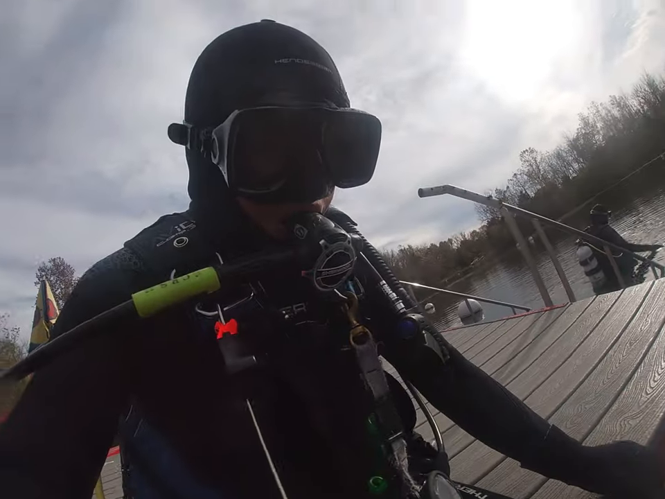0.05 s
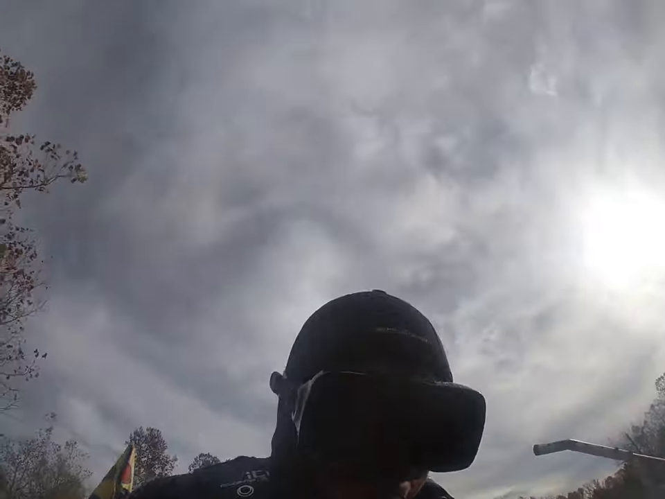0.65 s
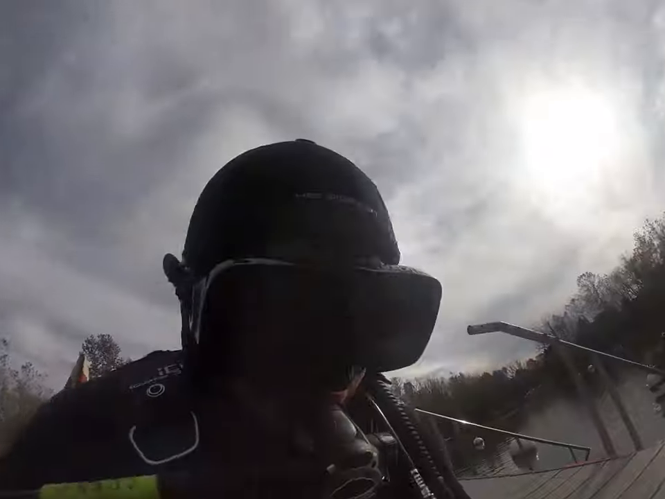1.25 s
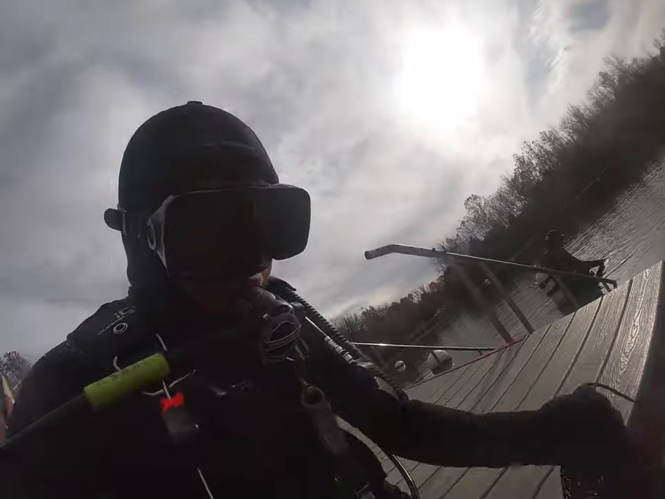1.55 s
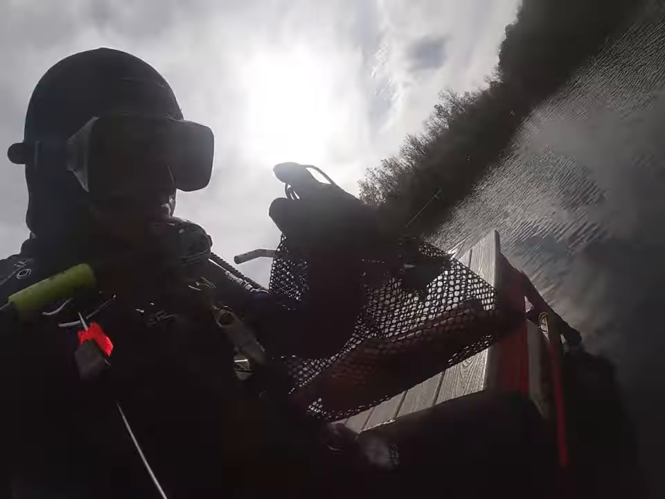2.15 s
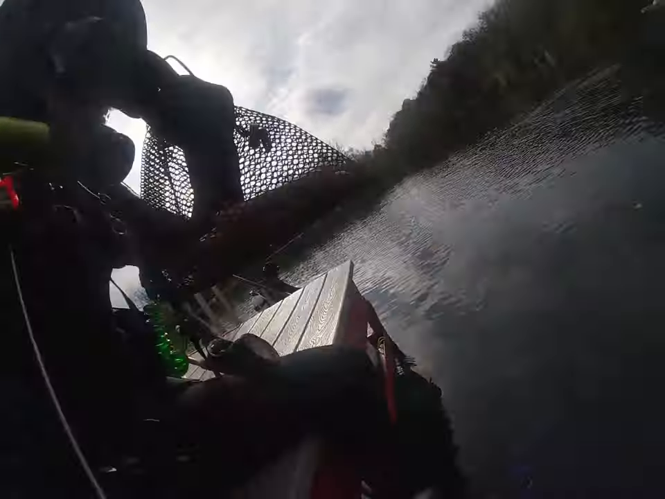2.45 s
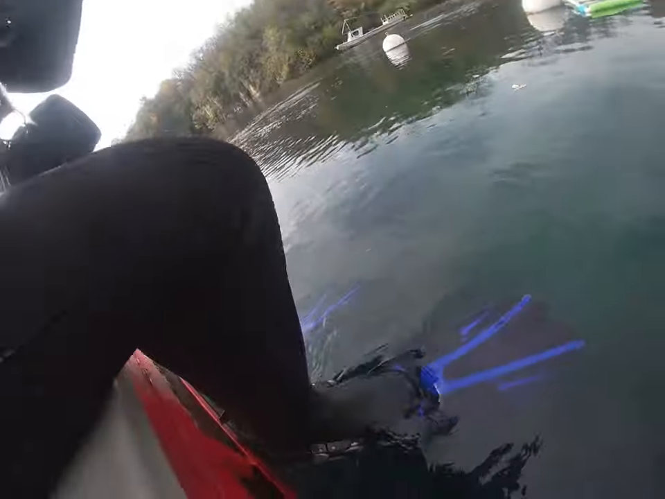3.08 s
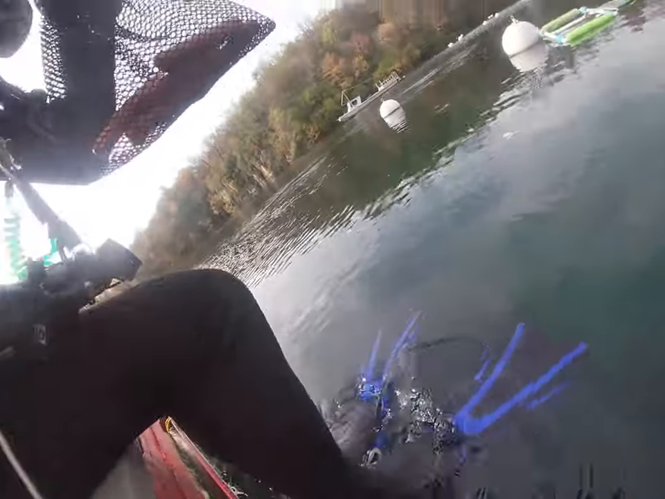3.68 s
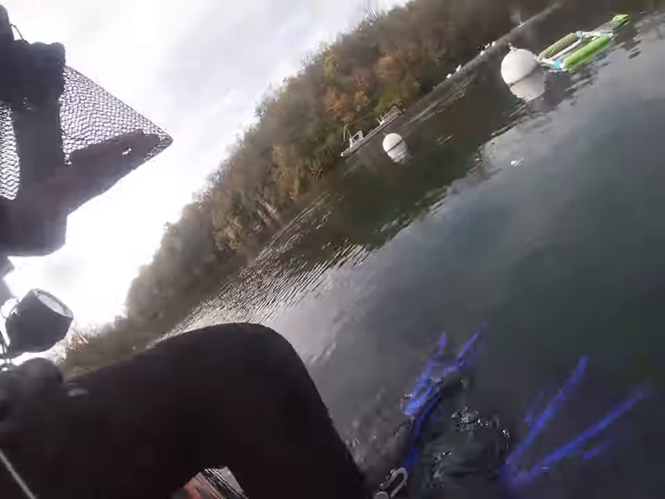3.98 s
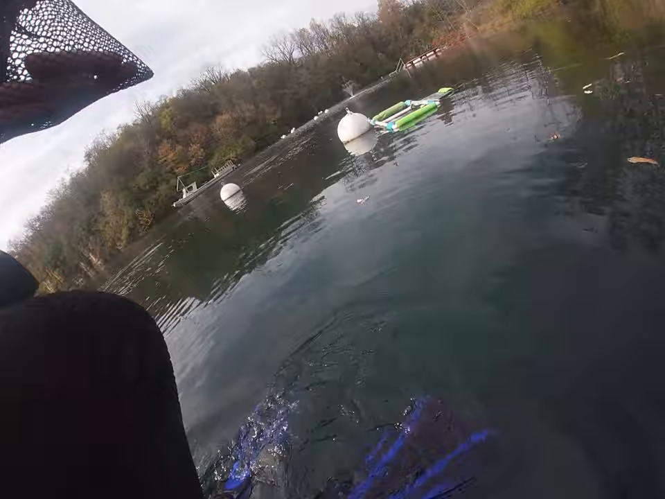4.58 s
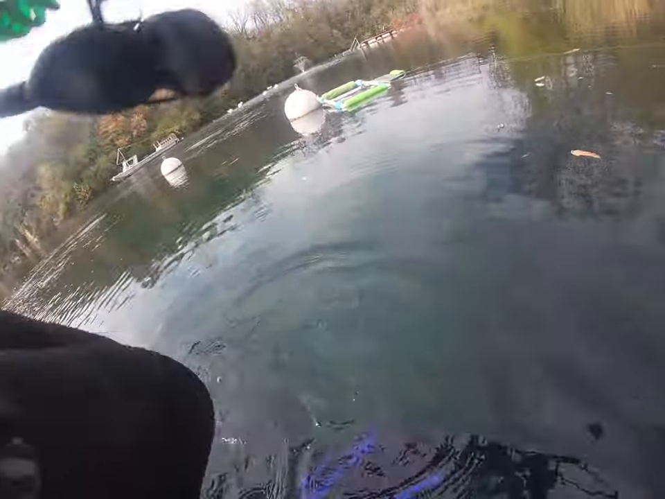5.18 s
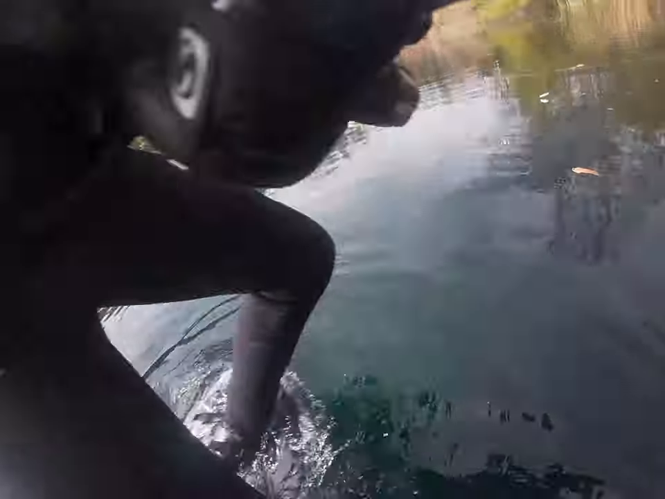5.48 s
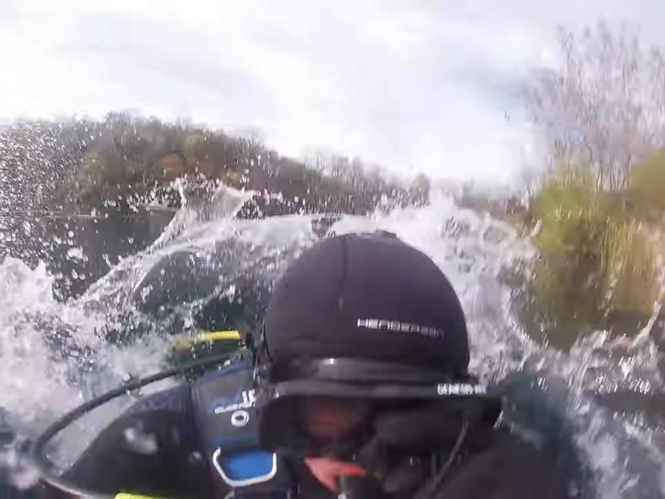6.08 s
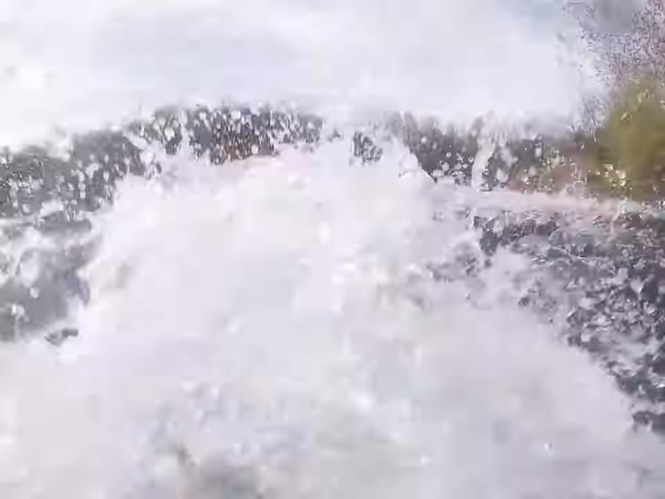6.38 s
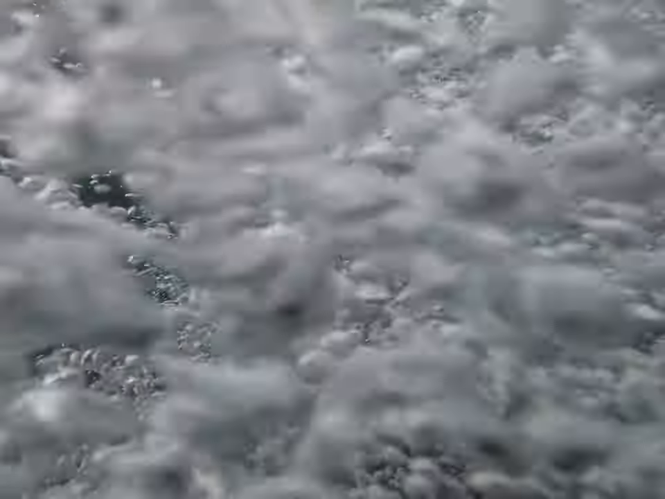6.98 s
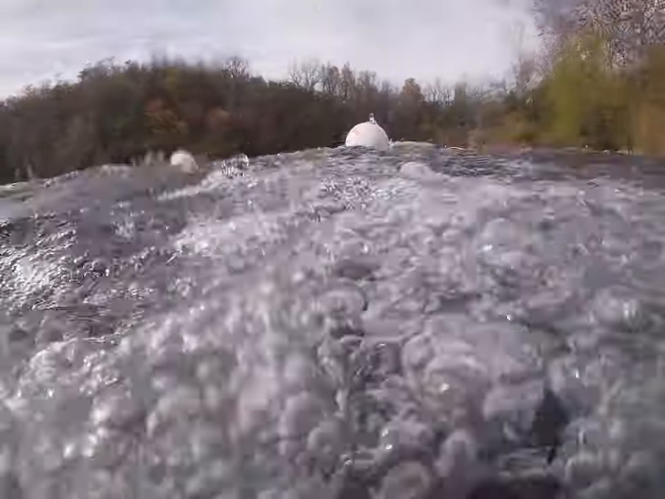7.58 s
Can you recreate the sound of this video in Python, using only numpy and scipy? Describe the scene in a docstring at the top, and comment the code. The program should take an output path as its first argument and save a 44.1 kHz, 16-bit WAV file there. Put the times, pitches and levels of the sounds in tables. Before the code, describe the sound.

Diving gear scrapes and knocks against a sealed camera, then a diver splashes into a lake and bubbles gurgle and fizz.

```python
"""Diver entering a lake

Heard through a sealed action camera's housing. As the diver shuffles off a dock, gear scrapes (stick-slip),
knocks and jolts it, over a breeze, a low rumble and a faint valve whistle. Water slaps and sloshes on
the housing, a cloud of ringing bubbles gurgles and fizzes past, and the camera surfaces.
The loudest peaks overload."""
import sys
import numpy as np
from scipy import signal
from scipy.fft import rfft, irfft, next_fast_len
from scipy.io import wavfile
from scipy.ndimage import uniform_filter1d, minimum_filter1d, map_coordinates

SR = 44100
rng = np.random.default_rng(int(sys.argv[2]) if len(sys.argv) > 2 else 0)


def pcm_store(signal):
    """Save signal as 16-bit PCM."""
    levels = np.round(np.clip(np.atleast_2d(signal), -1, 1) * 32767)
    wavfile.write(sys.argv[1], SR, levels.astype(np.int16).T)


N = 345744
TIME_S = np.arange(N) / SR

# open air through the housing: (frequency [Hz], relative gain [dB])
AIR_COLOUR = [(100, 9.5), (300, -13), (800, 3.5), (2000, 1.5), (3500, -8.5), (7000, -19), (9000, -44.5),
              (16000, -52)]
# open air: (time [s], level [dB])
AIR_LEVELS = [(0, -45), (1.0, -41), (1.16, -49.5), (1.9, -50), (2.3, -53), (2.6, -36), (3.6, -36.5),
              (4.4, -47), (4.75, -55), (5.35, -56.5), (6, -48), (7.84, -65)]
# air valve: (start [s], end [s], initial pitch [Hz], level [dB])
WHISTLES = [(0, 0.204, 2780, -48.5), (2.277, 2.46, 4370, -42.5)]
# housing sway: (time [s], relative level [dB])
SWAY_LEVELS = [(0.0, -33.5), (0.46, -19.5), (1.0, -19), (1.42, -26), (2.88, -32), (2.99, -26.5),
               (5.0, -17.5), (5.48, -27), (5.92, -14), (6.22, -24), (6.68, -26), (6.97, -34), (7.64, -36),
               (7.84, -31.5)]
# rumble between contacts: (time [s], relative level [dB])
RUMBLE_LEVELS = [(0.0, -38.5), (0.39, -25.5), (0.89, -22), (1.13, -34.5), (1.6, -25), (2.31, -44.5),
                 (2.49, -33), (3.78, -26.5), (4.1, -30.5), (4.15, -27), (4.3, -8.5), (4.49, -38.5),
                 (4.51, -25), (5.29, -12), (5.35, -42), (5.5, -18), (5.68, -14), (5.71, -31), (5.78, -8),
                 (5.91, -23.5), (5.94, -12.5), (6.66, -25), (6.77, -13), (7.75, -31), (7.78, -7),
                 (7.84, -23)]
# jolts of the mount: (time [s], pitch [Hz], envelope peak [dB])
JOLTS = [(.202, 106, 3), (1.887, 50.5, -2), (2.093, 46, -1.5), (2.405, 55, -5), (2.893, 31, -4),
         (3.028, 29.6, -2), (5.258, 111, 0), (5.273, 300, 0), (5.279, 900, -2), (6.294, 124, -4.5),
         (7.78, 57, -2)]
# big air pockets closing: (time [s], pitch [Hz], envelope peak [dB])
GULPS = [(5.085, 142, -10.5), (5.52, 159, -12), (5.655, 178, -8), (5.772, 204, -4.5), (5.79, 290, -7.5),
         (6.652, 636, -8.5), (7.105, 258.5, -3.5), (7.52, 500, -7)]
# fizz under water: (frequency [Hz], relative gain [dB])
FIZZ_COLOUR = [(400, 1.5), (800, -2.5), (1150, -2), (1550, 1.5), (2100, -24.5), (3400, -26.5),
               (4200, -41.5), (6500, -39), (7300, -51), (16000, -62)]
# foam on the housing: (time [s], level [dB])
FIZZ_LEVELS = [(6.8, -33.5), (6.92, -23), (7.2, -28), (7.27, -38), (7.35, -28.5), (7.55, -31.5),
               (7.72, -36), (7.84, -48)]
# bubbles: (time [s], small relative level [dB], small centre pitch [Hz], large relative level [dB])
BUBBLE_CLOUD = [(6.62, -23, 553, -26), (6.722, -13, 399, -22), (6.962, -11.5, 439.6, -14.5),
                (7.17, -13.5, 344, -10.5), (7.394, -12, 400, -19), (7.566, -18, 508, -29.5),
                (7.638, -33.5, 440, -40.5), (7.75, -37, 316, -30.5)]
# wet housing: (frequency [Hz], relative gain [dB])
WET_COLOUR = [(150, -6), (350, 0), (900, -6), (1800, -3), (2150, -18), (3200, -16), (4200, -22),
              (5900, -21), (6600, -37), (8000, -47), (16000, -60)]
# wet housing resonances: (centre [Hz], width [Hz], lift [dB])
WET_RESONANCES = [(1500, 300, 6.6), (2930, 720, 7.3), (3660, 210, 6.5), (4800, 150, 4.1), (5740, 220, 3.3)]
# water washing over the housing: (start [s], end [s], mid-band level [dB], hardness [dB])
SLOSHES = [(4.686, 4.73, -43, -1.5), (4.828, 4.853, -32, -3), (4.875, 4.905, -43, 3), (4.945, 5.0, -34, -1),
           (5.014, 5.04, -31, 0), (5.09, 5.16, -40, -2), (5.19, 5.225, -38, 2), (5.265, 5.282, -31, -11),
           (5.472, 5.51, -42, -0.5), (5.59, 5.745, -43.5, -2.5), (5.84, 5.885, -32.5, 3.5),
           (5.886, 5.955, -25.5, 1), (5.975, 6.028, -27, -2), (6.088, 6.16, -22, 0.5),
           (6.165, 6.232, -24, 1), (6.245, 6.304, -31, 4.5), (6.355, 6.375, -21.5, 8),
           (6.405, 6.44, -27.5, 9), (6.475, 6.58, -25, 9), (6.578, 6.639, -19.5, 13), (6.645, 6.73, -23, 5),
           (6.733, 6.81, -28.5, 2)]
# water striking the housing: (time [s], relative peak [dB])
SLAPS = [(4.833, -4), (5.021, -4), (5.417, -19), (5.607, -14), (5.841, -9), (5.942, -5), (6.007, 3),
         (6.117, -10), (6.147, 0), (6.22, 9.5), (6.293, 2), (6.369, 5), (6.505, 3), (6.689, 0),
         (6.717, 4.5), (7.029, -1.5), (7.067, -9.5), (7.796, -15)]
# dry housing: (frequency [Hz], relative gain [dB])
DRY_COLOUR = [(150, -14), (350, -5), (850, -5), (1100, -2), (2000, -1), (3000, -5), (3800, -12),
              (4900, -10), (5400, -23), (7400, -28), (9000, -42), (11000, -52), (16000, -66)]
# dry housing resonances: (centre [Hz], width [Hz], lift [dB])
DRY_RESONANCES = [(723, 19, 7), (1078, 81, 8.5), (1586, 84, 6.5), (1780, 27, 10.5), (2010, 65, 5.5),
                  (2268, 66, 6.5), (2950, 170, 3), (4300, 160, 5), (5980, 180, 8.5)]
# metal gear modes: (frequency [Hz], relative level [dB], T60 [s])
GEAR_MODES = [(727, -12, 0.14), (817, -5, 0.64), (1040, -4, 0.29), (1690, 5.5, 0.16), (2570, 6.5, 0.13),
              (3214, -31, .1), (6700, -43, .4)]
# gear scraping the housing: (start [s], end [s], mid-band level [dB], hardness [dB])
SCRAPES = [(.228, .238, -20, 3), (.26, .283, -28, 0), (.333, .378, -20.5, 0.5), (.38, .425, -15.5, 3),
           (.43, .495, -18, -1), (.5, .625, -30, -5), (.632, .86, -16, -6), (.86, .915, -20, 5),
           (.985, 1.012, -41, -16.5), (1.05, 1.11, -34.5, -6.5), (1.275, 1.485, -15, 3),
           (1.49, 1.55, -29, -10.5), (1.666, 1.704, -18, 0), (1.975, 2.045, -29.5, -5),
           (2.118, 2.165, -19, 6), (2.445, 2.505, -29.5, 3), (2.513, 2.59, -27, 3.5),
           (2.598, 2.655, -18, 3), (2.735, 2.767, -27.5, 5.5), (2.847, 2.884, -18.5, 3.5),
           (2.971, 3.02, -32.5, -11.5), (3.055, 3.111, -19, 3.5), (3.138, 3.2, -19, 3),
           (3.288, 3.345, -28, 1.5), (3.385, 3.45, -26.5, -3), (3.455, 3.61, -21.5, 3),
           (3.645, 3.714, -20, 2), (3.715, 3.775, -32.5, 6.5), (3.815, 3.865, -34, -5),
           (3.891, 3.928, -21, 3.5), (3.94, 4.02, -27.5, 6.5), (4.125, 4.19, -29.5, 4),
           (4.195, 4.272, -26, 5.5), (4.292, 4.32, -27.5, 12), (4.368, 4.42, -29.5, 3),
           (4.5, 4.562, -26.5, -4), (4.575, 4.626, -30.5, 2.5)]
# buckles and hard gear striking the housing: (time [s], relative peak [dB])
KNOCKS = [(0.218, -5), (0.23, -3), (0.26, -1), (0.333, 2), (0.46, -3), (0.48, -2), (0.632, -5.5), (0.88, 0),
          (1.245, -13.5), (1.272, 2), (1.557, -1), (1.665, -1.5), (2.119, -4.5), (2.14, -1), (2.15, -6),
          (2.438, -0.5), (2.513, 1.5), (2.671, 4), (2.849, -4.5), (3.208, -1), (3.244, -10), (3.397, 5.5),
          (3.441, 3.5), (3.649, 0), (3.709, -3.5), (3.932, -5), (4.142, 0), (4.22, -6), (4.295, -1.5),
          (4.311, 3.5), (4.366, -9), (4.56, -3)]

# body and edge re the mid band; edge_slope in dB per dB of hardness
WET_TOUCH = dict(attack_s=.02, release_s=.014, sag_db=-3.5, body_db=3.5, edge_db=-18, edge_slope=.43)
DRY_TOUCH = dict(attack_s=.0015, release_s=.02, sag_db=-3.5, body_db=-8.3, edge_db=-13, edge_slope=.62)


def undb(db):
    """Decibels to gain."""
    return 10 ** (np.asarray(db) / 20)


def unit(x):
    """Scale to rms 1."""
    return x / np.sqrt(np.mean(x ** 2) + 1e-18)


def running_rms(x, window_s):
    """Rms over a sliding window."""
    return np.sqrt(np.abs(uniform_filter1d(x ** 2, int(window_s * SR))) + 1e-18)


def steady(x, window_s):
    """Even out slow swells; rms 1."""
    return x / running_rms(x, window_s)


def curves(table):
    """Interpolate each column over time."""
    times_s, *columns = np.transpose(table)
    return [np.interp(TIME_S, times_s, column) for column in columns]


def add(out, start_s, x):
    """Mix x into out from start_s."""
    i = max(int(start_s * SR), 0)
    out[i:i + len(x)] += x[:max(N - i, 0)]


def band(x, lo_hz, hi_hz, order=2):
    """Band-pass filter."""
    return signal.sosfilt(signal.butter(order, [lo_hz, hi_hz], "band", fs=SR, output="sos"), x)


def response(colour, resonances=(), size=4096):
    """Minimum-phase impulse response of a body; peak 1."""
    hz = np.arange(size // 2 + 1) * SR / size
    colour_hz, colour_db = np.transpose(colour)
    db = np.interp(np.log(hz + 1), np.log(colour_hz), colour_db)
    for centre_hz, width_hz, lift_db in resonances:
        db += lift_db / (1 + (2 * (hz - centre_hz) / width_hz) ** 2)
    cepstrum = irfft(np.log(undb(db)))
    cepstrum[1:size // 2] *= 2
    cepstrum[size // 2 + 1:] = 0
    impulse = irfft(np.exp(rfft(cepstrum)))[:size // 4]
    return impulse / np.abs(impulse).max()


def clicks(n, per_s, spread_db):
    """Random impulses, mostly small, a few large."""
    occurs = rng.random(n) < per_s / SR
    size = np.minimum(rng.standard_exponential(n), 3.5)
    return occurs * undb(spread_db * size) * rng.choice([-1, 1], n)


def wander(x, depth_db, width_hz, hold_s):
    """A moving contact point brings different housing resonances forward in turn."""
    hz, t, cells = signal.stft(x, SR, nperseg=256, noverlap=192)
    grid = np.meshgrid(hz / width_hz, t / hold_s, indexing="ij")
    emphasis = map_coordinates(rng.standard_normal((128, 1024)), grid, order=1, mode="wrap")
    gain = unit(undb(depth_db * emphasis))
    return signal.istft(cells * gain, SR, nperseg=256, noverlap=192)[1][:N]


def stroke(force, housing, db, hard_db, attack_s, release_s, sag_db, body_db, edge_db, edge_slope):
    """One contact bites, sags and lets go; harder contact has less body, more edge."""
    n = len(force)
    t = TIME_S[:n]
    attack = 1 - np.exp(-t / attack_s)
    release = np.minimum(t[::-1] / release_s, 1) ** 2
    sag = undb(sag_db * np.linspace(0, 1, n))
    ring = signal.fftconvolve(force * attack * sag * release, housing)
    size = next_fast_len(2 * len(ring))
    spectrum = rfft(ring, size)
    hz = np.arange(size // 2 + 1) * SR / size
    low = 1 / (1 + (hz / 900) ** 8)
    high = 1 - 1 / (1 + (hz / 3500) ** 8)
    body, mid, edge = (unit(irfft(spectrum * share, size)[:len(ring)])
                       for share in (low, 1 - low - high, high))
    mix = undb(body_db - hard_db) * body + mid + undb(edge_db + edge_slope * hard_db) * edge
    return undb(db) * np.sqrt(len(ring) / n) * mix


def contacts(table, force, housing, touch, lead_s, linger_s, graze_db, softer_db):
    """Strokes driven by force(n), each inside a lighter graze that leads and lingers."""
    out = np.zeros(N)
    graze = dict(touch, attack_s=lead_s, release_s=linger_s)
    for start_s, end_s, db, hard_db in table:
        press = force(int((end_s - start_s + .75 * touch["release_s"]) * SR))
        add(out, start_s, stroke(press, housing, db, hard_db, **touch))
        brush = force(int((end_s - start_s + lead_s + linger_s) * SR))
        add(out, start_s - lead_s, stroke(brush, housing, db + graze_db, hard_db - softer_db, **graze))
    return out


def blows(table, housing, chatter_s, chatter_db):
    """Impulses with brief chatter ring the housing."""
    out, t = np.zeros(N), TIME_S[:len(housing)]
    for start_s, db in table:
        force = undb(chatter_db) * rng.standard_normal(len(t)) * np.exp(-t / chatter_s)
        force[0] += 1
        hit = signal.fftconvolve(force, housing)
        add(out, start_s, undb(db) * hit / np.abs(hit).max())
    return out


def air(waver_db=2):
    """Soft, unsteady wash of breeze and lake."""
    level_db, = curves(AIR_LEVELS)
    waver = unit(band(rng.standard_normal(N), 5.7, 6))
    wash = unit(signal.fftconvolve(rng.standard_normal(N), response(AIR_COLOUR))[:N])
    return undb(level_db + waver_db * waver) * wash


def valve(rise_hz_per_s=500, fade_s=.025):
    """An air valve whistles, thin and fluttering, creeping up in pitch."""
    out = np.zeros(N)
    flutter = unit(band(rng.standard_normal(N), 5, 110))
    for start_s, end_s, hz, db in WHISTLES:
        t = TIME_S[:int((end_s - start_s) * SR)]
        envelope = np.minimum(np.minimum(t, t[::-1]) / fade_s, 1)
        tone = np.sqrt(2) * np.sin(2 * np.pi * (hz + rise_hz_per_s * t / 2) * t)
        add(out, start_s, undb(db) * envelope * tone)
    return out * flutter


def buffeting(contact):
    """Hand, air and water push the housing: slow sway, and lumpy rumble that grows with each contact."""
    (sway_db,), (rumble_db,) = curves(SWAY_LEVELS), curves(RUMBLE_LEVELS)
    sway = steady(band(rng.standard_normal(N), 13.8, 47, order=3), window_s=.092)
    # (frequency [Hz], relative gain [dB])
    body = response([(45, -11.5), (80, .5), (130, 0), (220, -7), (330, -17.5), (600, -27),
                     (1500, -54.5), (6000, -102.5)])
    lumps = signal.fftconvolve(clicks(N, per_s=200, spread_db=4), body)[:N]
    push = running_rms(band(contact, 200, 880), window_s=.02)
    rumble = np.hypot(undb(rumble_db - .5), push) * steady(lumps, window_s=.11)
    return undb(sway_db + 5) * sway + rumble


def thumps(table, rise_cycles):
    """A jolted mount or closing air pocket: one note swells and dies within cycles."""
    out, t = np.zeros(N), TIME_S[:SR // 3]
    for start_s, hz, db in table:
        age = hz * t / rise_cycles
        add(out, start_s, undb(db) * age * np.exp(1 - age) * np.sin(2 * np.pi * hz * t))
    return out


def foam():
    """Dense pops and hiss fizz on the submerged housing."""
    level_db, = curves(FIZZ_LEVELS)
    pops = unit(clicks(N, per_s=900, spread_db=9)) + undb(-3) * rng.standard_normal(N)
    fizz = unit(signal.fftconvolve(pops, response(FIZZ_COLOUR, WET_RESONANCES))[:N])
    fade_in = np.clip((TIME_S - 6.76) / .05, 0, 1)
    return fade_in * undb(level_db) * wander(fizz, depth_db=6, width_hz=200, hold_s=.014)


def bubbles(centre_hz, per_s, spread_oct, decay_cycles, glide, scatter_db):
    """Each bubble rings at its own pitch, rising with glide as it dies; rms 1."""
    out, t = np.zeros(N), TIME_S[:SR // 12]
    centre_hz = np.full(N, centre_hz)
    first_s = BUBBLE_CLOUD[0][0]
    span_s = BUBBLE_CLOUD[-1][0] - first_s
    for when, pitch, strength in rng.random((int(per_s * span_s), 3)):
        start_s = first_s + when * span_s
        hz = np.interp(start_s, TIME_S, centre_hz) * 2 ** (spread_oct * (2 * pitch - 1))
        age = hz * t / decay_cycles
        envelope = np.exp(-age) * (1 - np.exp(-6 * age))
        phase = 2 * np.pi * hz * t * (1 + glide * np.minimum(age, 3))
        add(out, start_s, undb(scatter_db * strength ** 2) * envelope * np.sin(phase) / hz)
    return steady(out + 1e-9 * rng.standard_normal(N), window_s=.069)


def bubble_cloud(tiny_fade_db_per_s=19):
    """Air dragged under by the diver: large and small bubbles gurgle, tiny ones tick."""
    small_db, small_hz, large_db = curves(BUBBLE_CLOUD)
    tiny_db = -37.5 - tiny_fade_db_per_s * np.maximum(TIME_S - BUBBLE_CLOUD[0][0], 0)
    small = bubbles(small_hz, per_s=240, spread_oct=.3, decay_cycles=3.84, glide=.029, scatter_db=10.5)
    large = bubbles(255., per_s=110, spread_oct=.42, decay_cycles=3.9, glide=.03, scatter_db=9)
    tiny = bubbles(3500., per_s=650, spread_oct=.8, decay_cycles=3.5, glide=0, scatter_db=24)
    gurgle = undb(small_db + .5) * small + undb(large_db - 1.3) * large
    ticks = undb(tiny_db) * band(tiny, 1500, 5700, order=3)
    fade_in = np.clip((TIME_S - 6.63) / .036, 0, 1)
    return fade_in * (gurgle + ticks)


def droplets(n):
    """Force of dense droplets in a sheet of water."""
    return unit(clicks(n, per_s=800, spread_db=6.5)) + undb(-.5) * rng.standard_normal(n)


def splash():
    """Water washes and slaps the housing, which rings lower and duller when wet."""
    housing = response(WET_COLOUR, WET_RESONANCES)
    washing = contacts(SLOSHES, droplets, housing, WET_TOUCH,
                       lead_s=.032, linger_s=.072, graze_db=-14, softer_db=1)
    washing = wander(washing, depth_db=5, width_hz=260, hold_s=.014)
    return washing + undb(-3.5) * blows(SLAPS, housing, chatter_s=.004, chatter_db=-12.5)


def stick_slip(n, per_s=240, scatter_db=7, slip_s=.003, grit_db=5, count=200):
    """Surfaces catch and let go at uneven gaps; each slip is a snap and a short gritty slide."""
    onsets = np.cumsum(rng.gamma(2, SR / per_s / 2, count)).astype(int)
    onsets -= onsets[0]
    size = undb(scatter_db * (2 * rng.random(count) - 1))
    snaps = np.bincount(onsets[onsets < n], size[onsets < n], n)
    slide = signal.lfilter([1], [1, -np.exp(-1 / (slip_s * SR))], snaps)
    return unit(snaps) + undb(grit_db) * unit(slide * rng.standard_normal(n))


def bounces(start_s=1.975, first_gap_s=.023, shrink=.92, count=5):
    """A loose clasp bounces, each time sooner and weaker: (time [s], relative peak [dB])."""
    k = np.arange(count)
    gaps_s = first_gap_s * shrink ** k
    return list(zip(start_s + np.cumsum(gaps_s) - gaps_s, -9 - 2 * k))


def gear():
    """Straps and buckles scrape and knock the dry housing; metal parts ring on faintly."""
    housing = response(DRY_COLOUR, DRY_RESONANCES)
    scraping = contacts(SCRAPES, stick_slip, housing, DRY_TOUCH,
                        lead_s=.017, linger_s=.08, graze_db=-16.5, softer_db=3.5)
    scraping = wander(scraping, depth_db=4.5, width_hz=330, hold_s=.02)
    knocking = blows(list(KNOCKS) + bounces(), housing, chatter_s=.0015, chatter_db=-9)
    direct = scraping + undb(2) * knocking
    t = TIME_S[:SR // 2]
    ring = sum(undb(db - 60 * t / t60_s) * np.sin(2 * np.pi * hz * t) for hz, db, t60_s in GEAR_MODES)
    return direct + undb(-62.5) * signal.fftconvolve(direct, ring)[:N]


def scene():
    """All sources reach one microphone through the housing."""
    contact = gear() + splash()
    jolts = thumps(JOLTS, rise_cycles=.38)
    gulps = thumps(GULPS, rise_cycles=2.35)
    return (contact + jolts + gulps + buffeting(contact) + bubble_cloud() + foam() + air() + valve())[None]


def record(dry):
    """A fast limiter ducks overloads, remaining peaks clip, and a low-pass cuts the top."""
    hold, ceiling, top_hz = int(.0012 * SR), 1.065, 16000
    gain = ceiling / np.maximum(np.abs(dry), ceiling)
    gain = uniform_filter1d(minimum_filter1d(gain, hold), hold)
    lowpass = signal.ellip(8, .2, 70, top_hz, fs=SR, output="sos")
    return signal.sosfilt(lowpass, np.clip(dry * gain, -1, 1))


dry = scene()
out = record(dry)
pcm_store(out)
```